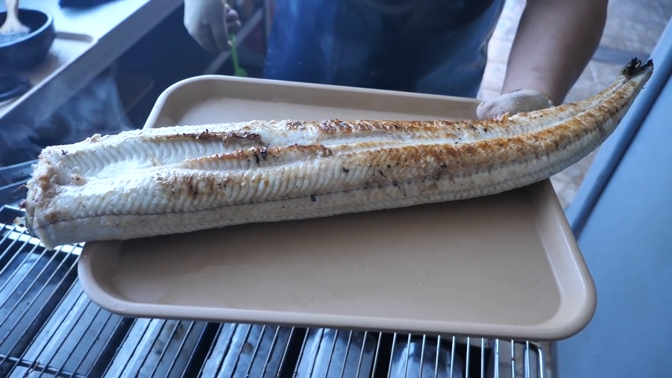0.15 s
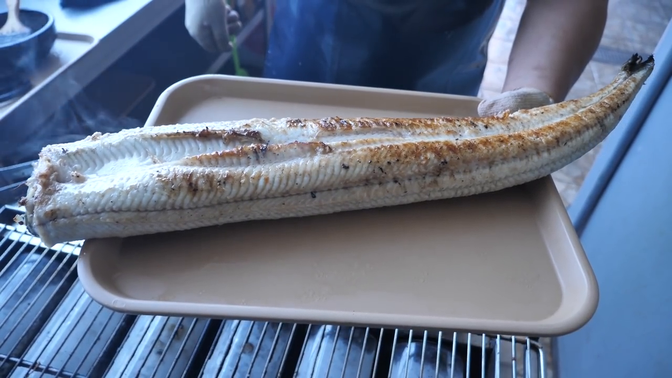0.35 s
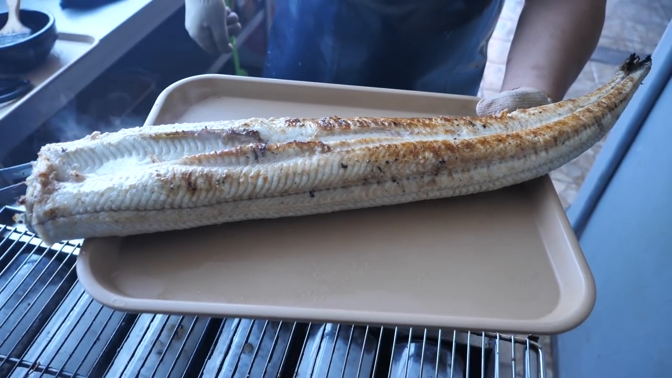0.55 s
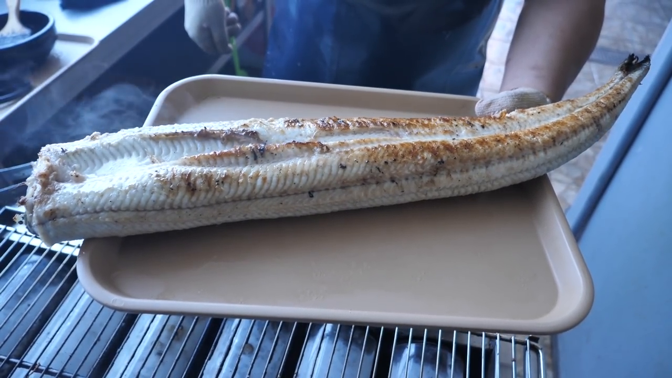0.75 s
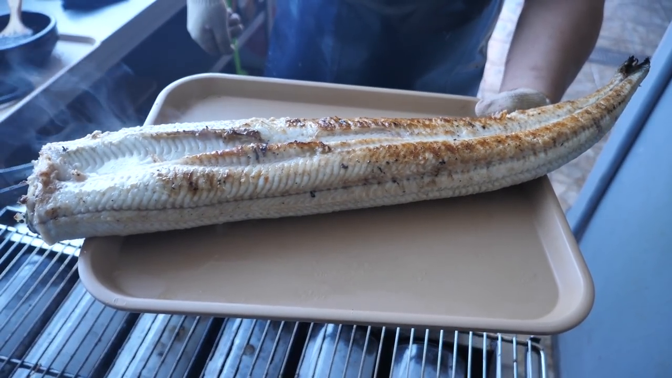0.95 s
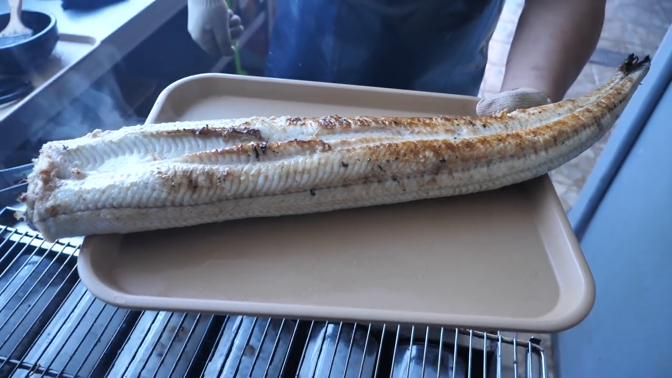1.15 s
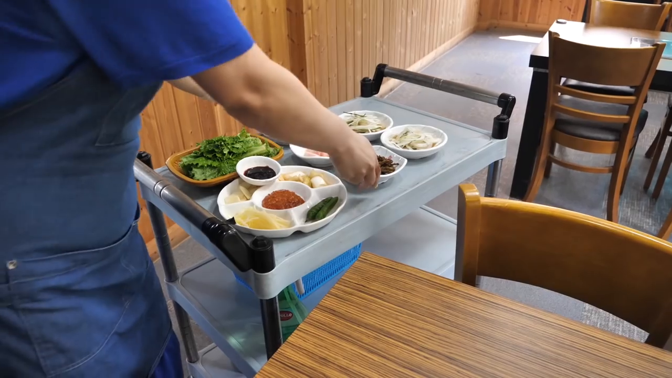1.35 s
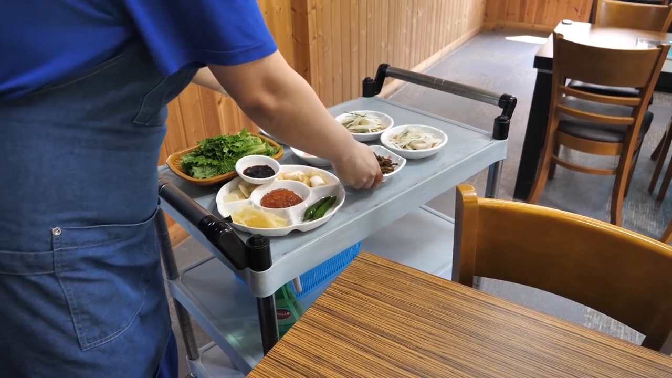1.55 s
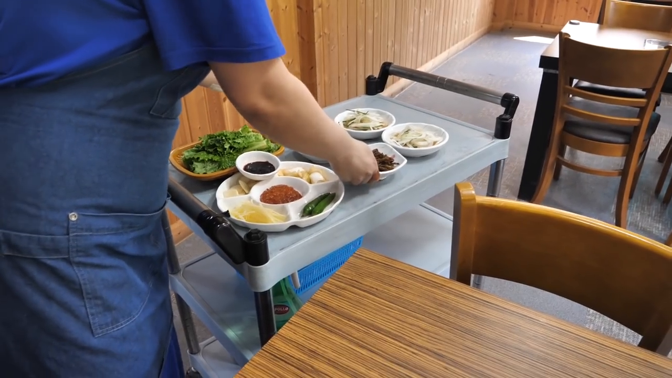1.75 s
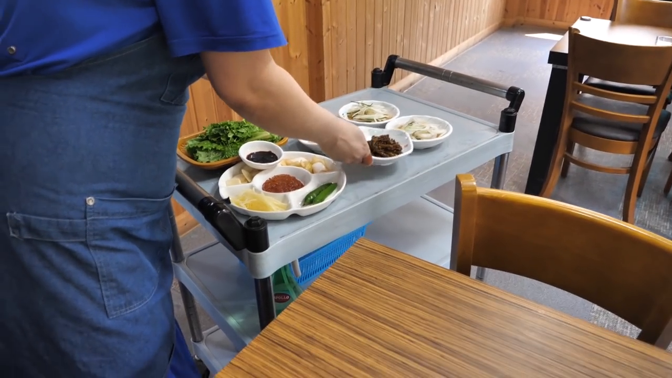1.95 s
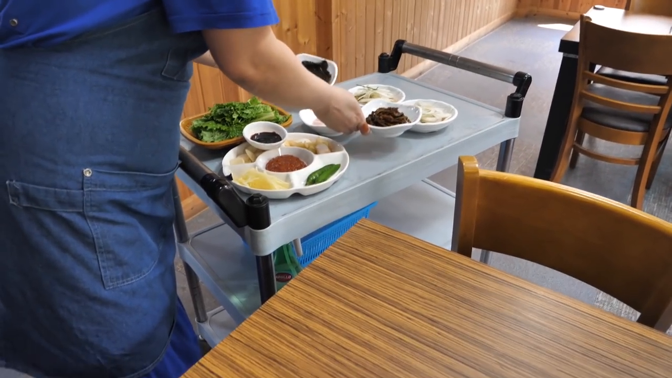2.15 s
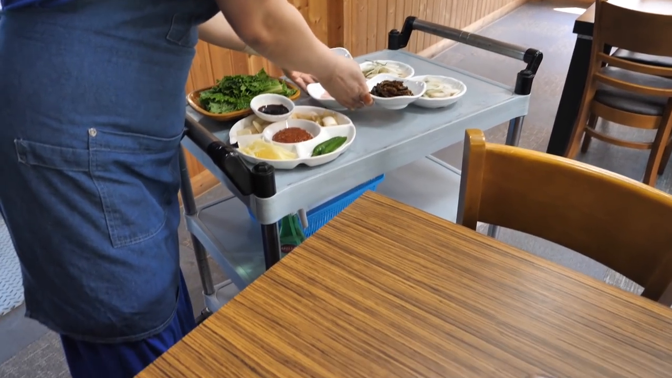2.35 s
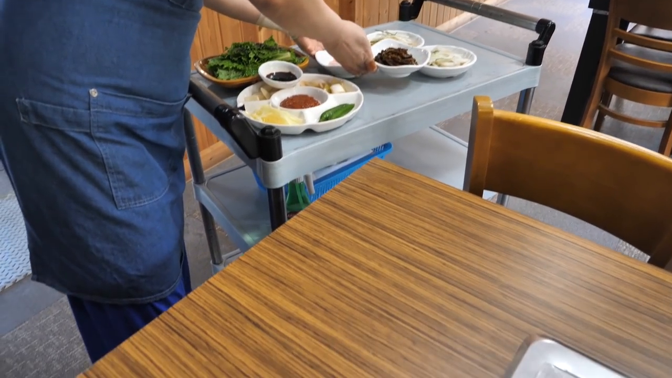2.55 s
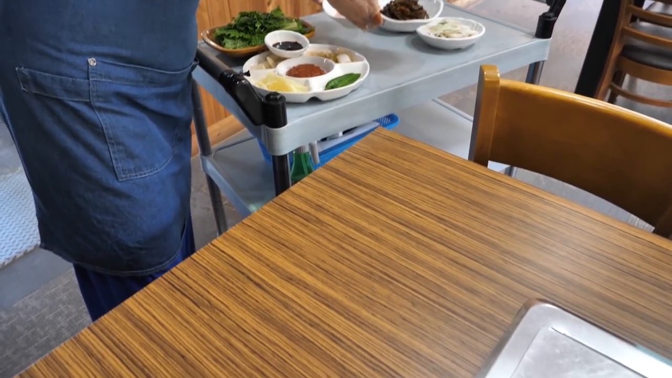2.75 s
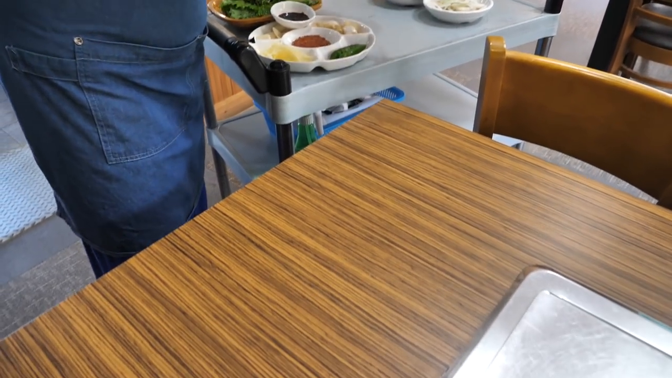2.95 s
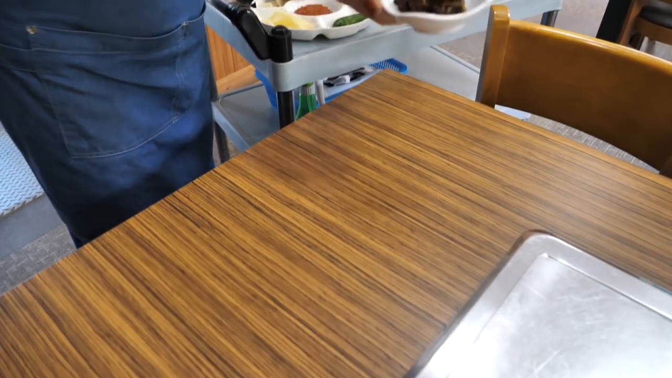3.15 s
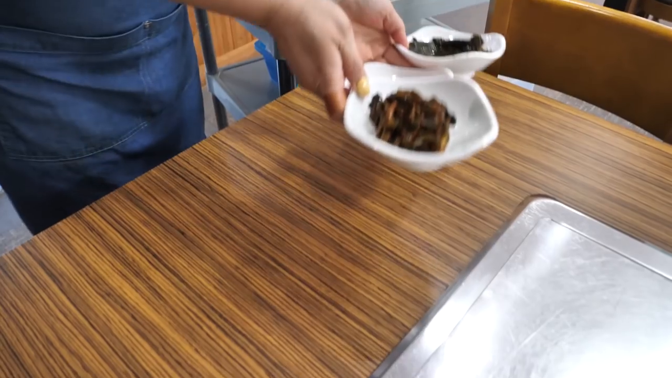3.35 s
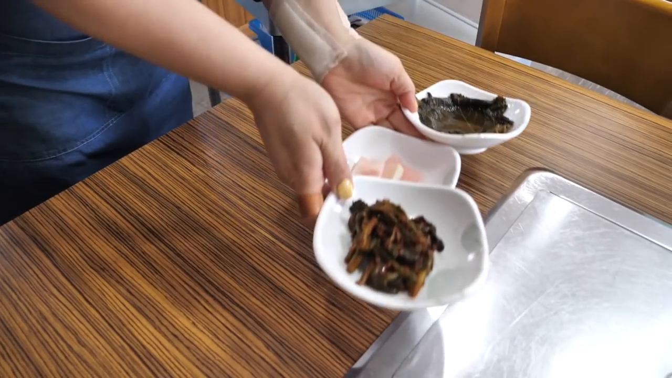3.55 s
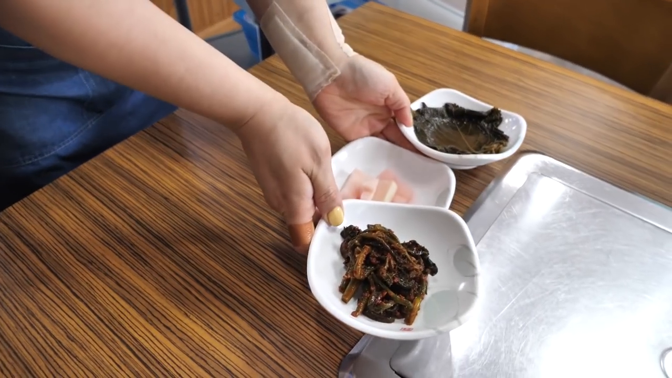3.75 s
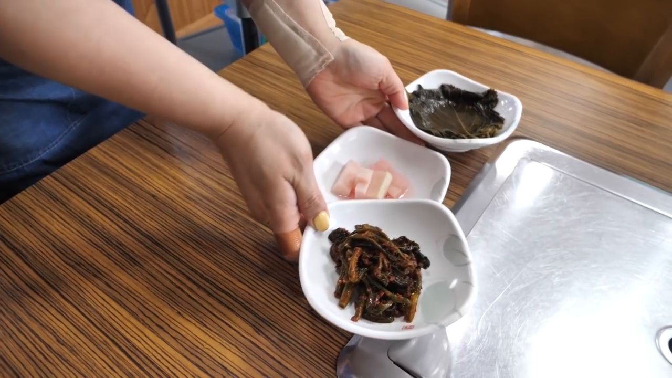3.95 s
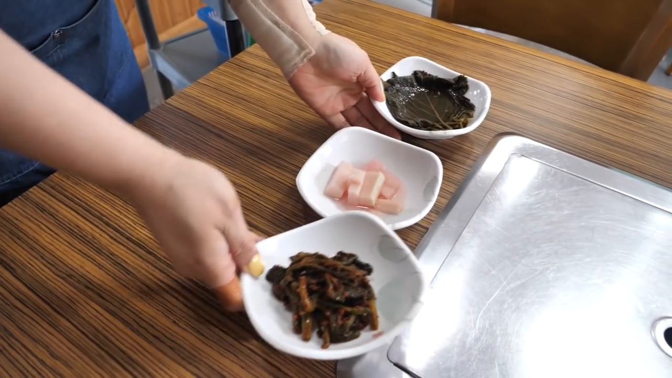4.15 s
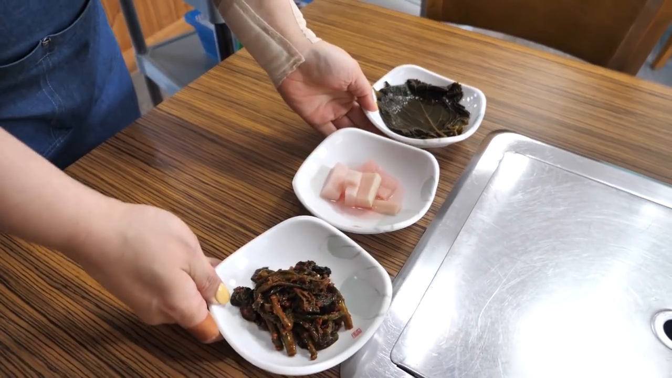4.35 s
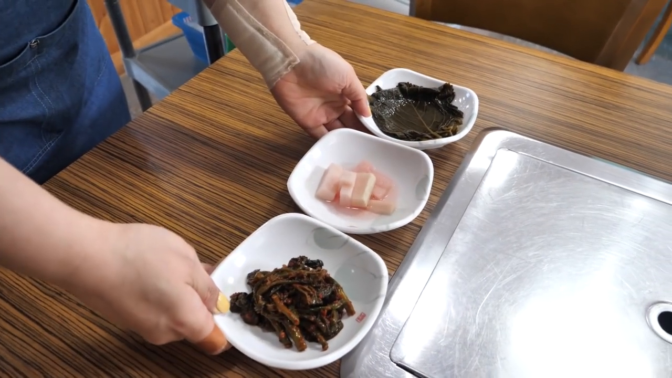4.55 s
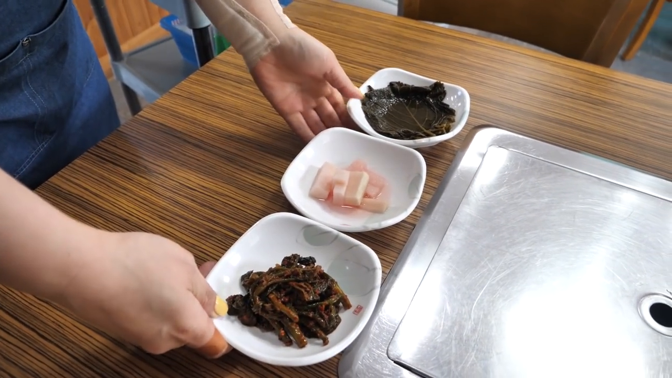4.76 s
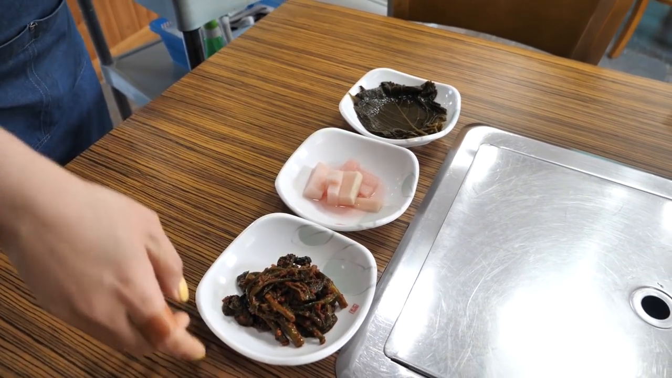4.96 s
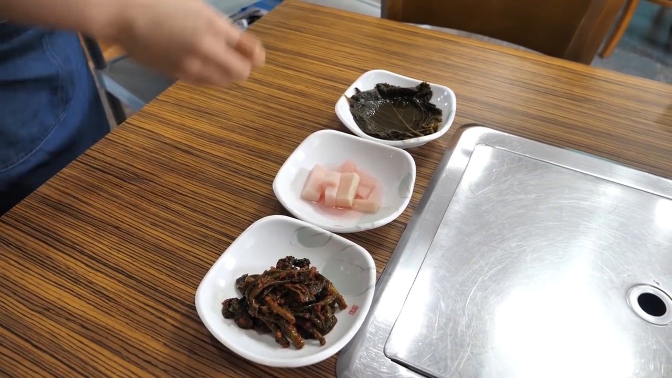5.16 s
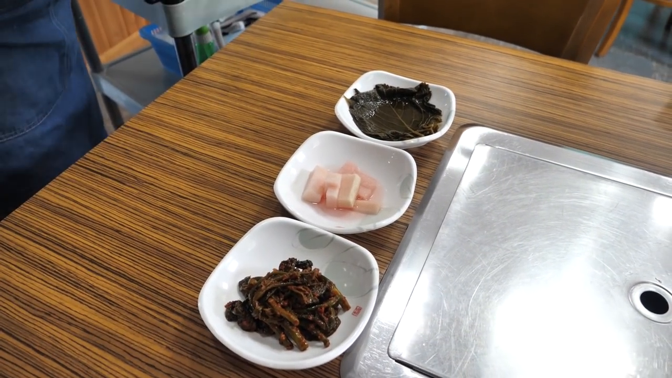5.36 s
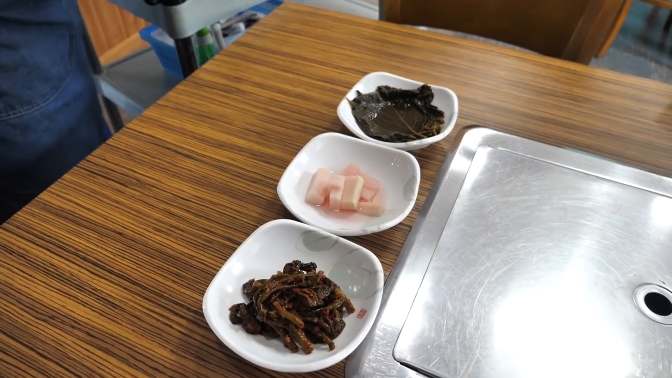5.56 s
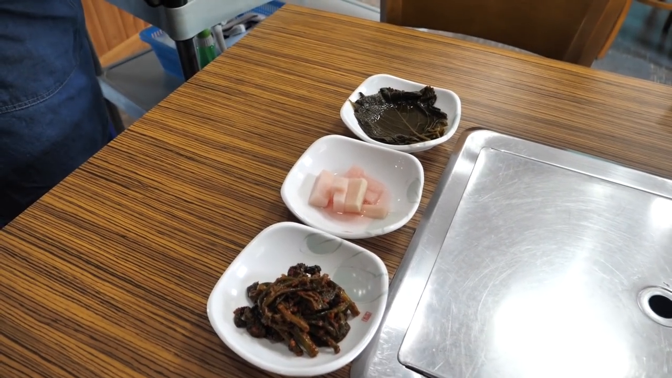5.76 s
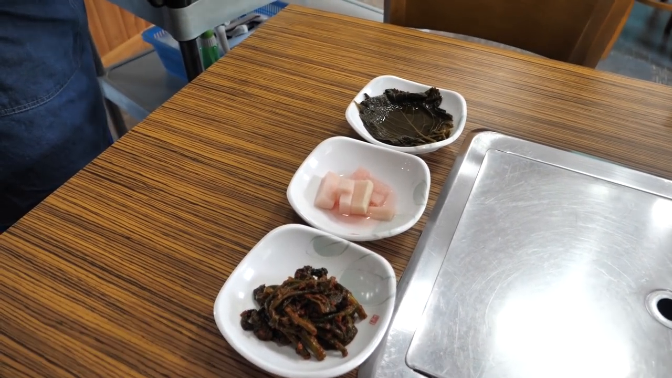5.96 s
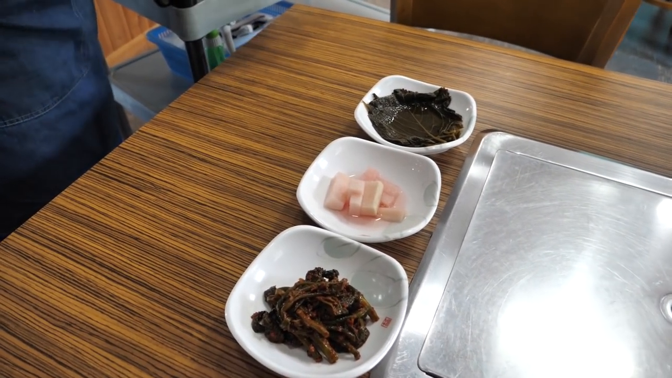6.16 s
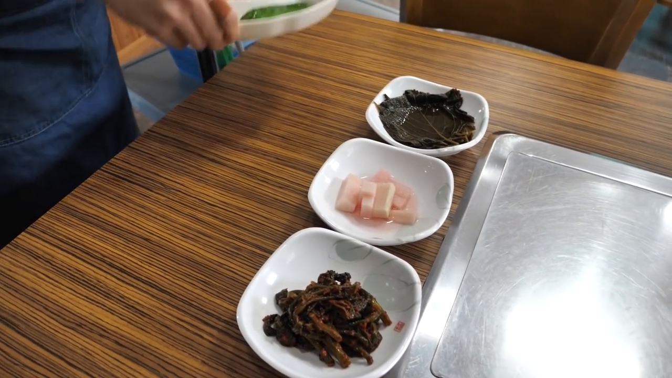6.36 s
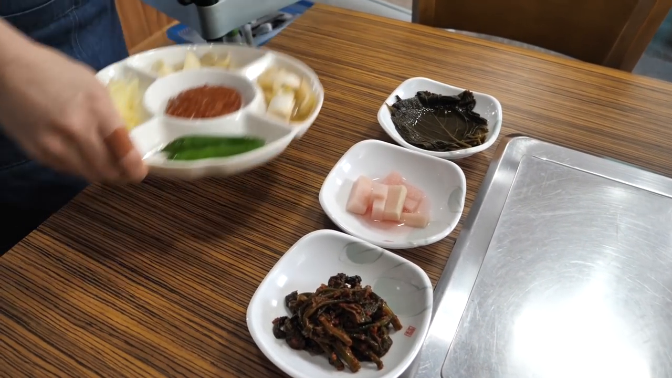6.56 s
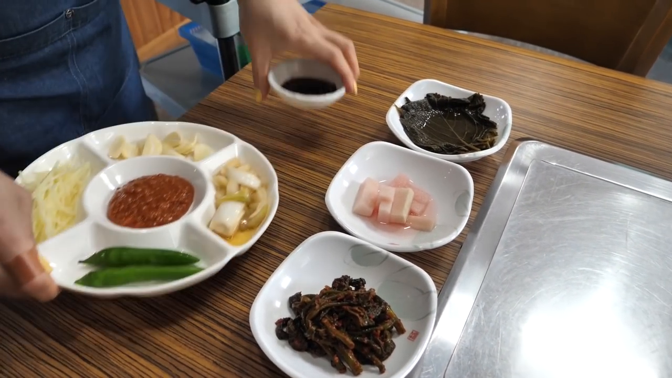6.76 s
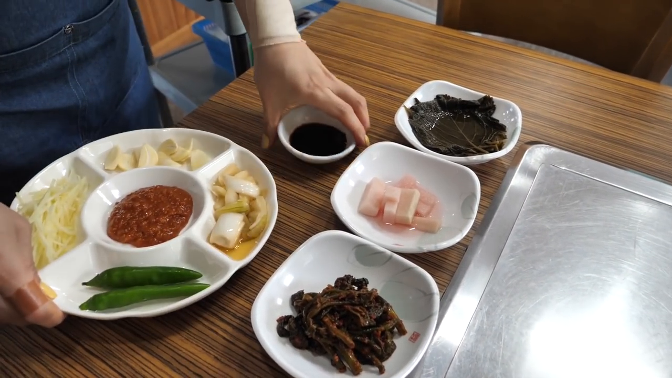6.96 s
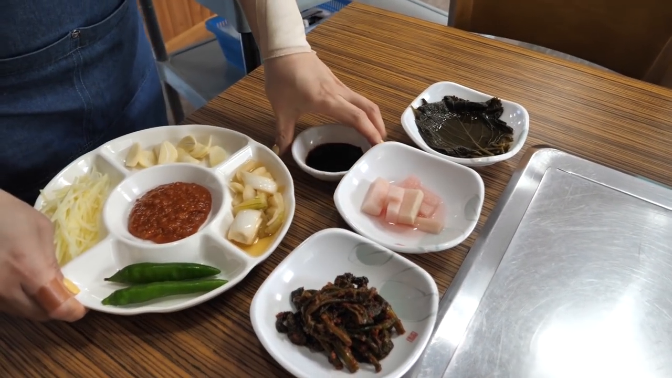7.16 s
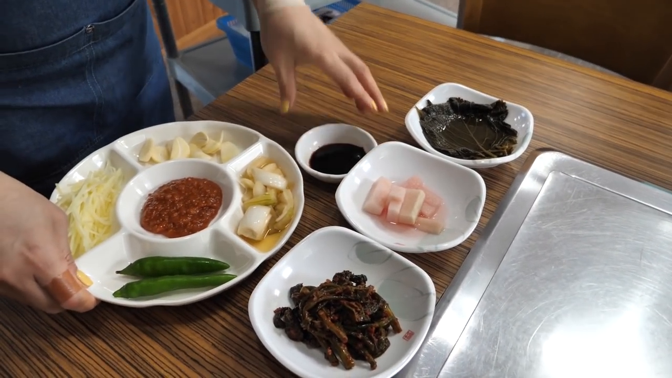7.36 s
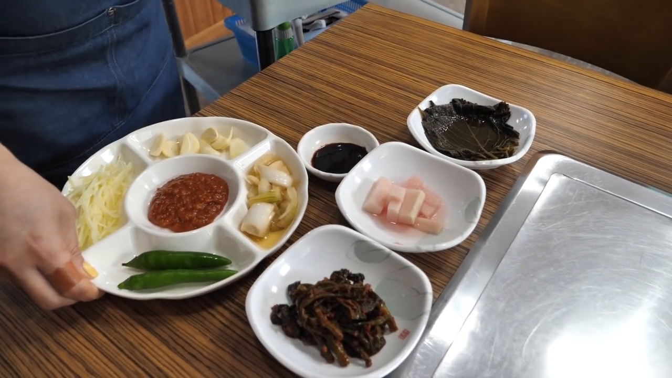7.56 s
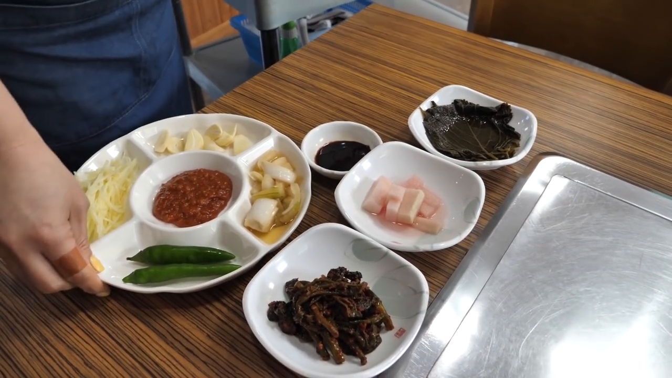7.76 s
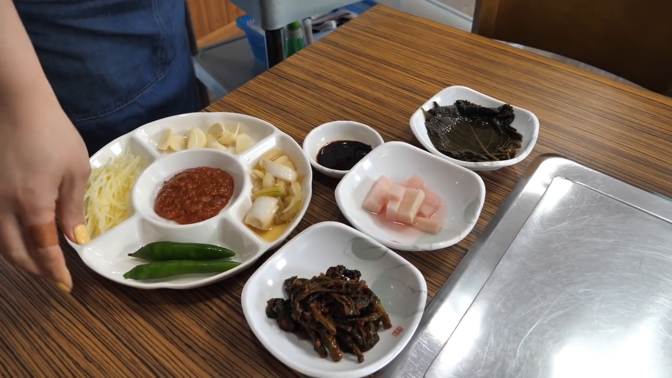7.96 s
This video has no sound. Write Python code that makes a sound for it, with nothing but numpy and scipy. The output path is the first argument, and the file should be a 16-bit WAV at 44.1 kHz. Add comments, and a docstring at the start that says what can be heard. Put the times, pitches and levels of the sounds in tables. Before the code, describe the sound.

Low, boomy fan rush stops abruptly; in hushed room air, stoneware dishes clink, knock and slide on wood, loud and near.

```python
"""At a grill an extractor fan roars, then the scene cuts to a quiet dining room with dishes close to the microphone.
Dishes clink on a plastic cart, are set down and slid on a wooden table: blows are decaying modes plus a noisy
clack, slides are random slips through resonances, ticks are short ringing bursts. A noise tail is the brief
answer of the room. Fan and room air are coloured noise, the fan with narrow duct resonances on top."""
import sys
import numpy as np
from scipy import signal
from scipy.fft import rfft, irfft, next_fast_len
from scipy.io import wavfile
from scipy.ndimage import uniform_filter1d, map_coordinates

SR = 44100
rng = np.random.default_rng(int(sys.argv[2]) if len(sys.argv) > 2 else 0)


def to_wav(s):
    """Save 16-bit WAV."""
    ch = np.atleast_2d(s).T  # columns
    pcm = np.round(np.clip(ch, -1, 1) * 32767)  # PCM
    wavfile.write(sys.argv[1], SR, pcm.astype(np.int16))


N = 353241
TIME = np.arange(N) / SR
CUT_S = 1.353  # from the grill to the dining room
RUB_GLIDE = 0.34  # a push over the wood starts low and ends high


def strike():
    """Each blow rings the modes of its dish and adds a dense clack; rows: direct sound, feed to the room."""
    # modes of a stack of dishes [f/Hz, level/dB, t60/s]; the next five tables have the same columns
    stack = [(150, -5, .09), (305, -7, .12), (328, -6, .12), (742, -9, .04), (920, -7, .03),
             (1178, -4, .03), (1351, -5, .035), (1674, -4, .03), (1986, -2, .03), (2228, -4, .04),
             (2567, -5, .035), (2761, 3, .045), (3100, -2, .02), (3881, -9, .11), (4231, -11, .07),
             (5211, -15, .04), (5905, -14, .04), (6820, -11, .055), (7900, -16, .03), (8613, -10, .04)]
    # a side dish
    side_dish = [(257, -6.5, 0.068), (302, -8, 0.15), (385, 7, 0.017), (578, 2, 0.029), (788, 3.5, 0.029),
                 (1000, 11, 0.012), (1368, 7, 0.014), (1896, 6, 0.014), (2210, -7, 0.023),
                 (2660, 3.5, 0.0094), (3780, -36, 0.0099), (5270, -32, .012)]
    # a platter on the plastic cart
    platter_on_cart = [(150, -12, .05), (290, -13, .06), (490, -14, .05), (720, -11, .07), (775, -7, .07),
                       (1345, 0, .04), (1905, -6, .03), (2180, -9, .025), (2700, -8, .025),
                       (3000, -14, .03), (4080, -12, .06), (4620, -16, .03), (5180, -20, .025),
                       (7500, -20, .015)]
    # a platter on the table
    platter = [(127, -11.5, 0.16), (205, -5, 0.033), (319, -5.5, 0.12), (503, -31, 0.042), (557, 8, 0.017),
               (773, 5, 0.053), (1295, 1, 0.035), (1503, 4, 0.032), (2070, -1, 0.038), (2500, -17, 0.037),
               (3750, -27, 0.023), (5100, -31, .015), (5920, -1.5, 0.014), (8700, -35, .015)]
    # a cup
    cup = [(329, -21.5, 0.084), (537, -17.5, 0.014), (1380, -14, 0.021), (1492, 5.5, 0.024),
           (1518, 9.5, 0.011), (1960, -2.5, 0.023), (2190, 5, 0.01), (2580, -1.5, 0.016),
           (2980, -6.5, 0.03), (4500, -18, 0.017), (5740, -26, 0.024), (8950, -16, 0.024),
           (12000, -30, 0.0067)]
    # the rim of a dish
    dish_rim = [(250, -10.5, 0.032), (419, -6.5, 0.044), (567, -4, 0.1), (910, -14, 0.045),
                (1346, -2, 0.053), (1740, -17, 0.14), (2030, -11, 0.067), (2720, -20, .02),
                (4300, -16, .015), (6000, -9, .012)]
    # modes, clack f/Hz, clack decay/s, extra clack to the room/dB, room share/dB
    things = {"stack": (stack, 1280, 0.0026, 11.5, -24.5),
              "side dish": (side_dish, 880, 0.0032, 4.1, -26.5),
              "platter on cart": (platter_on_cart, 1220, 0.0041, 9.9, -27),
              "platter": (platter, 725, 0.0028, 4.5, -27.5),
              "cup": (cup, 1840, .0023, 9.8, -25.5),
              "dish rim": (dish_rim, 740, 0.0064, 8.3, -31.5)}
    # blows [t/s, thing, peak level/dB, contact time/ms, clack level/dB against the ring]
    blows = [(2.4813, "stack", -6, 0.027, -4.5), (2.492, "stack", -9, 0.14, -8),
             (2.4953, "stack", -6.5, .15, -24), (2.502, "stack", -27, 0.11, -8),
             (3.8012, "side dish", -1, 0.18, 1), (3.904, "side dish", -17, 1.2, -15),
             (4.2218, "side dish", -2, 0.54, 0.5), (4.2468, "side dish", -9.5, 1.7, -2),
             (4.4263, "side dish", -1.5, 0.16, 4), (4.4576, "side dish", -14, 0.25, -16),
             (4.506, "side dish", -13, 0.17, 6), (4.527, "side dish", -15.5, .38, -11),
             (4.6189, "side dish", -12, 0.092, -5.5), (6.1067, "platter on cart", -3.5, 0.1, 0),
             (6.1532, "platter on cart", -10.5, 0.043, -15), (6.189, "platter on cart", -18.5, 0.16, -2),
             (6.217, "platter on cart", -23, 0.13, -16), (6.805, "platter", 2, 0.14, 2),
             (6.974, "platter", -1, 0.46, -2), (7.0164, "platter", -5.5, 0.11, 2),
             (7.2337, "cup", -1.5, .26, -2), (7.2359, "cup", -2, 0.19, -8), (7.2688, "cup", -1, .13, -1.5),
             (7.3, "cup", -9, 0.28, -1), (7.3096, "cup", -13, 0.33, -5),
             (7.635, "dish rim", -12, 0.083, -3.5), (7.6934, "dish rim", -23, .37, 7),
             (7.7576, "dish rim", -21.5, 1.8, 10)]
    ring_to_room_s = .014  # only the start of the ring feeds the room

    out = np.zeros((2, N))
    t = TIME[:SR // 5]
    for s, thing, peak_db, contact_ms, clack_db in blows:
        modes, clack_hz, clack_s, diffuse_db, room_db = things[thing]
        hz, db, t60 = (column[:, None] for column in np.transpose(modes))
        # neighbouring modes swing against each other
        sign = (-1.) ** np.arange(len(modes))[:, None]
        # no two blows ring quite alike
        chance = rng.standard_normal((2, len(modes), 1))
        gain = undb(db + 1.5 * chance[0])
        pitch = hz * (1 + .004 * chance[1])
        swing = sign * gain * np.sin(2 * np.pi * pitch * t)
        ring = np.sum(swing * 1000. ** (-t / t60), axis=0)
        ring = ring / abs(ring).max()

        clack = band(rng.standard_normal(len(t)), clack_hz, 1.2 * clack_hz) * np.exp(-t / clack_s)
        clack = undb(clack_db) * clack / abs(clack).max()
        # the clack spreads through the furniture, so the room gets more of it
        diffuse = undb(diffuse_db) * spread(clack, clack_hz, 1.17 * clack_hz)
        to_room = ring * np.exp(-t / ring_to_room_s) + diffuse
        # a longer, softer contact dulls the treble
        keep = np.exp(-1000 / (max(contact_ms, .01) * SR))
        sound, sent = signal.lfilter([1], [1, -keep], [ring + clack, to_room])
        add(out, s, sound, sent, peak_db, room_db)
    return out


def slide(rows, rub, slips_hz, spread_db, glide=0):
    """Uneven random slips shake a few damped resonances, whose pitch may climb along a push."""
    slips = (rng.random(N) < slips_hz / SR) * rng.standard_normal(N)
    slips = slips * undb(spread_db * walk(70))
    rubbed = unit(sum(undb(db) * unit(band(band(slips, hz, width), hz, 2 * width))
                      for hz, width, db in rub))
    climb = sum((TIME - s) / half * np.exp(-((TIME - s) / half) ** 2 / 2) for s, half, _ in rows)
    # reading the rubbing slower or faster bends its pitch
    position = np.cumsum(np.exp(glide * climb))
    return swells(rows) * map_coordinates(rubbed, [position], order=1, mode="mirror")


def side_dish_slide():
    """The side dish slips over the wood grain in short pushes that rise in pitch."""
    # pushes [t/s of the peak, half length/s, level/dB]
    pushes = [(3.92, 0.025, -43), (4.36, 0.049, -24.5), (4.47, 0.041, -35), (4.535, 0.023, -27.5),
              (4.67, 0.048, -36.5)]
    # resonances rubbed into sound [f/Hz, width/Hz, level/dB]
    rub = [(264, 72, -2), (332, 190, 20), (457, 400, 0), (855, 140, -16), (1400, 590, -16.5)]
    return slide(pushes, rub, 1800, 1.2, RUB_GLIDE)


def platter_slide():
    """The platter slips more densely and evenly over the grain, again rising in pitch."""
    # pushes [t/s of the peak, half length/s, level/dB]
    pushes = [(6.91, 0.053, -31.5), (7.06, 0.057, -29.5), (7.19, .05, -30), (7.27, .03, -25)]
    # resonances rubbed into sound [f/Hz, width/Hz, level/dB]
    rub = [(294, 240, -1), (435, 360, 13.5), (760, 300, 5.5), (1380, 150, 7.5), (2480, 280, -7)]
    return slide(pushes, rub, 2500, 0.63, RUB_GLIDE)


def platter_squeal():
    """Dense, very uneven slips in high resonances: a thin squeal as the platter drags."""
    # the drag [t/s of the peak, half length/s, level/dB]
    drag = [(7.13, 0.13, -56.5)]
    # squealing resonances [f/Hz, width/Hz, level/dB]
    rub = [(5900, 250, 0), (8000, 400, -11), (8750, 300, -9), (13000, 1500, -11)]
    return slide(drag, rub, 4000, 3.2)


def ticks():
    """Small ticks and far knocks: short bursts through one resonance each, with a bright snap on top."""
    # ticks [t/s, peak level/dB, ring f/Hz, ring width/Hz, snap level/dB against the ring, room share/dB]
    tick_rows = [(1.7211, -25.5, 595, 790, -20, -14), (1.742, -30.5, 289, 200, -15, -18),
                 (1.832, -27, 1400, 910, 6, -12), (1.97, -29.5, 220, 400, -19, -19.5),
                 (2.371, -34, 990, 200, -20, -27), (2.617, -41, 7000, 8000, -20, -17),
                 (3.545, -31.5, 169, 170, -25, -29), (4.768, -41, 2760, 3000, -10, -24),
                 (4.808, -38, 2930, 2980, -6, -25), (5.571, -32, 835, 300, -20, -20),
                 (5.573, -32, 1420, 120, -20, -19), (5.61, -46, 7000, 6000, -20, -18),
                 (5.668, -43, 5000, 8000, -10, -9), (5.698, -35.5, 223, 248, -25, -15.5),
                 (5.874, -34, 198, 250, -27, -32), (7.2558, -21, 8400, 880, 8, -32),
                 (7.605, -35.5, 5730, 9800, -15, -12)]
    burst_t60_s, pitch_power = 0.03, 0.42  # decay of a wide ring at 1 kHz, shorter for higher rings
    sharp_power = 0.35  # narrower rings last longer
    snap_hz, snap_width_hz, snap_t60_s = 3470, 3000, .015

    out = np.zeros((2, N))
    t = TIME[:SR // 5]
    for s, peak_db, hz, width_hz, snap_db, room_db in tick_rows:
        t60 = burst_t60_s * (1000 / hz) ** pitch_power * max(hz / width_hz, 1) ** sharp_power
        burst = rng.standard_normal(len(t)) * 1000. ** (-t / t60)
        ring = band(band(burst, hz, width_hz), hz, width_hz)
        ring = ring / abs(ring).max()
        snap = rng.standard_normal(len(t)) * 1000. ** (-t / snap_t60_s)
        snap = band(snap, snap_hz, snap_width_hz)
        snap = undb(snap_db) * snap / abs(snap).max()
        to_room = ring + spread(snap, snap_hz, snap_width_hz)
        add(out, s, ring + snap, to_room, peak_db, room_db)
    return out


def hall(send):
    """Diffuse room tail that builds up over the first reflections; each band decays at its own rate."""
    # bands of the tail [f/Hz, t60/s, level/dB of the energy per Hz]
    tail_bands = [(146, 0.6, 5.5), (503, 0.71, 4.5), (1520, 0.49, -2.5), (3670, 0.79, -5.5),
                  (10000, 0.42, -10)]
    t = TIME[:SR]
    tail = 0
    for hz, t60, db in tail_bands:
        noise = unit(band(rng.standard_normal(SR), hz, 1.8 * hz))
        # wide bands hold more energy, long decays need less level for it
        tail = tail + undb(db) * noise * np.sqrt(hz / t60) * 1000. ** (-t / t60)
    tail *= 1 - np.exp(-(t / 0.0078) ** 2)
    tail /= np.sqrt(np.sum(tail ** 2))
    return signal.fftconvolve(send, tail)[:N] * undb(10.5)


def fan():
    """Broad air roar with narrow duct resonances driven by noise; it stops dead at the cut."""
    # colour of the roar [f/Hz, level/dB per Hz]
    roar_spectrum = [(12, -49), (20, -11), (99, -0.5), (189, -10), (272, -20), (414, -21), (503, -24),
                     (563, -22), (766, -25.5), (1040, -23.5), (1590, -28), (3390, -36.5), (6640, -39.5),
                     (13800, -54), (16300, -63)]
    # duct resonances [f/Hz, width/Hz, level/dB]
    duct_modes = [(52.7, 11, -9.5), (95.2, 4, -4.5), (140, 12, -26), (181.7, 17, -9.5), (427, 27, -17.5),
                  (569.6, 17, -17), (904, 21, -16.5), (1036, 8.8, -16.5), (1168, 39, -17.5)]
    duct = sum(undb(db) * unit(band(band(rng.standard_normal(N), hz, width), hz, width))
               for hz, width, db in duct_modes)
    roar = unit(air(roar_spectrum, 0.78) + undb(-4.5) * duct)
    return (TIME < CUT_S) * undb(-23.5) * roar


def dining_room():
    """Ventilation rumble and hiss from the cut on, slowly sinking, and a distant rush near 900 Hz."""
    # colour of the room air [f/Hz, level/dB per Hz]
    room_spectrum = [(7.1, -30), (12, 13.5), (30, -1.5), (65, -9.5), (211, -18), (246, -16.5), (410, -21.5),
                     (449, -18.5), (685, -21), (927, -21), (1050, -25), (1180, -22.5), (2750, -34.5),
                     (5840, -41), (14900, -60), (16300, -90)]
    # swelling and fading of the distant rush [t/s, level/dB]
    rush_level = [(1.36, -48.5), (2.5, -43.5), (3.25, -50), (3.65, -45.5), (4.1, -51.5), (4.8, -68)]
    room_db, sinks_db_per_s = -38, 0.25
    rush = unit(band(band(rng.standard_normal(N), 890, 410), 930, 680)) * undb(1.8 * walk(8.6))
    level = (TIME >= CUT_S) * undb(room_db - sinks_db_per_s * (TIME - CUT_S))
    return level * air(room_spectrum, 0.21) + curve(rush_level) * rush


def faint_high_hiss():
    """Random slips in two wide high resonances: a treble tail fading at the cut, later a faint high hiss."""
    # swells of the hiss [t/s of the peak, half length/s, level/dB]
    hiss_swells = [(1.36, 0.12, -60), (3.63, 0.24, -65)]
    return slide(hiss_swells, [(13400, 2500, -1), (7000, 4000, 7)], 3000, 1.2)


def air(spectrum, flicker_db):
    """Noise of the given colour; each octave flickers on its own."""
    size = next_fast_len(N)
    hz = np.arange(size // 2 + 1) * SR / size + 1  # 1 Hz up, to keep the logarithm finite
    points, db = np.transpose(spectrum)
    colour = undb(np.interp(np.log(hz), np.log(points), db))
    shaped = rfft(rng.standard_normal(size)) * colour
    octave = np.log2(hz / 16)
    total = 0
    for k in range(11):
        share = np.clip(1 - abs(octave - k), 0, 1)  # overlapping triangles
        total = total + undb(flicker_db * walk(6)) * irfft(shaped * share, size)[:N]
    return unit(total)


def spread(burst, hz, width_hz):
    """An even click of similar colour and equal energy to the burst: what the walls get from all sides."""
    click = band(np.arange(len(burst)) == 0, hz, width_hz)
    return click * np.sqrt(np.sum(burst ** 2) / np.sum(click ** 2))


def add(out, s, sound, sent, peak_db, room_db):
    """Place a sound at its moment, as heard directly and as fed to the room."""
    start = int(s * SR)
    gains = undb([[peak_db], [peak_db + room_db]])
    pair = gains * [sound, sent] / abs(sound).max()
    out[:, start:start + len(sound)] += pair[:, :N - start]


def swells(rows):
    """Gain over time from (t/s, half length/s, level/dB) rows: each rises and falls like a bell curve."""
    return sum(undb(db) * np.exp(-((TIME - s) / half) ** 2) for s, half, db in rows)


def curve(rows):
    """Gain over time from (t/s, level/dB) rows, silent outside them."""
    s, db = np.transpose(rows)
    return undb(np.interp(TIME, s, db, left=-200, right=-200))


def walk(rate):
    """Random levels held 1 / rate s and smoothed twice; spread near 1."""
    hold = int(SR / rate)
    steps = np.repeat(rng.standard_normal(N // hold + 1), hold)
    return 1.6 * uniform_filter1d(uniform_filter1d(steps, hold), hold)[:N]


def band(x, hz, width_hz):
    """Resonance of gain 1 at its centre."""
    return signal.lfilter(*signal.iirpeak(min(hz, .45 * SR), hz / width_hz, fs=SR), x)


def unit(x):
    """Scale to an RMS level of 1."""
    return x / np.sqrt(np.mean(x ** 2))


def undb(db):
    """Amplitude factor from decibels."""
    return 10 ** (np.asarray(db) / 20)


def scene():
    """Dishes close by with their room tail, over the faint hiss, the fan and then the dining room air."""
    direct, send = strike() + ticks()
    slides = side_dish_slide() + platter_slide() + platter_squeal()
    # small dishes radiate no deep bass
    bass_cut = signal.butter(3, 110, "high", fs=SR, output="sos")
    near = signal.sosfilt(bass_cut, direct + slides + hall(send))
    return (near + faint_high_hiss() + fan() + dining_room())[None]


def record(dry):
    """The microphone drops the deepest rumble, peaks beyond full scale clip, the top is cut."""
    rumble_cut = signal.butter(2, 22, "high", fs=SR, output="sos")
    top_cut = signal.ellip(8, .2, 70, 16400, fs=SR, output="sos")
    heard = signal.sosfilt(rumble_cut, dry)
    return signal.sosfilt(top_cut, np.clip(heard, -1, 1))


dry = scene()
out = record(dry)
to_wav(out)
```